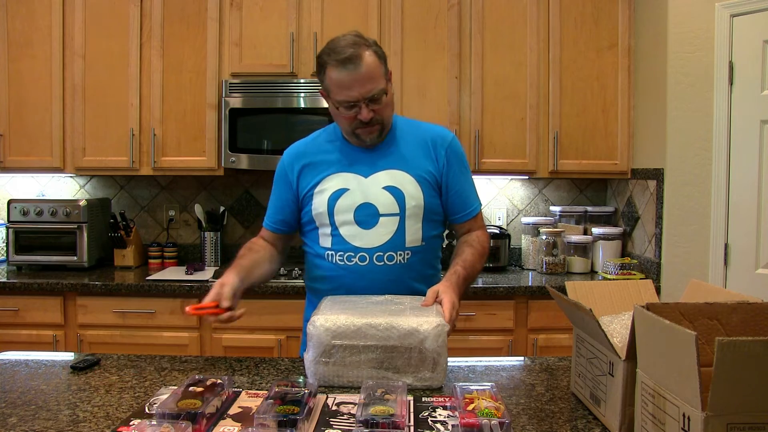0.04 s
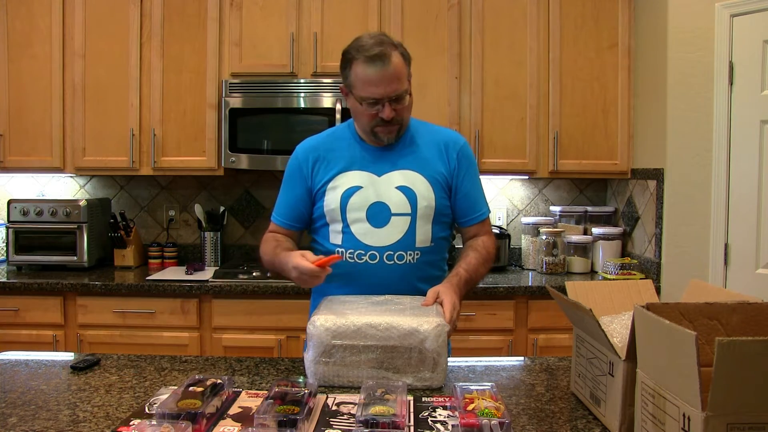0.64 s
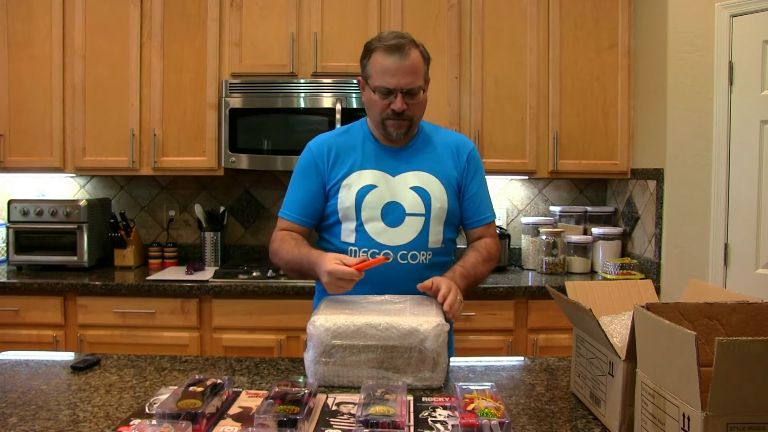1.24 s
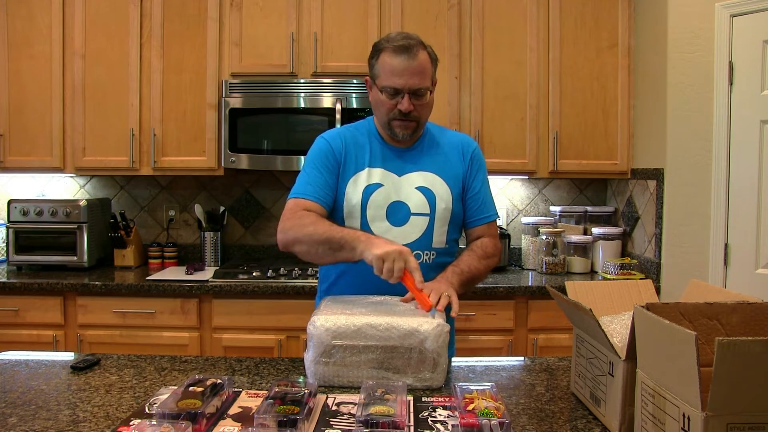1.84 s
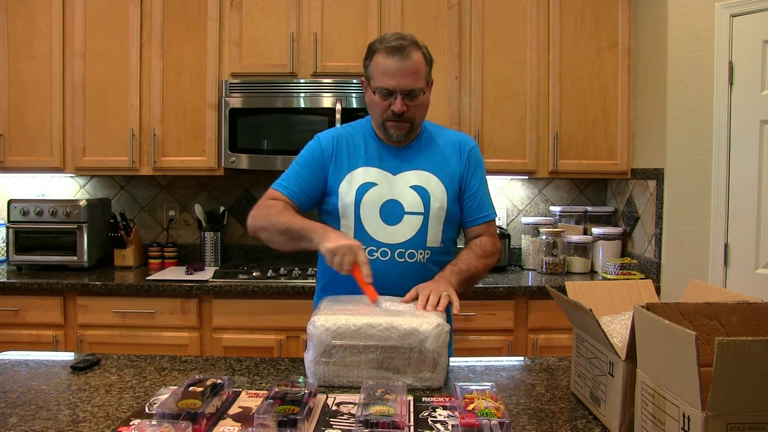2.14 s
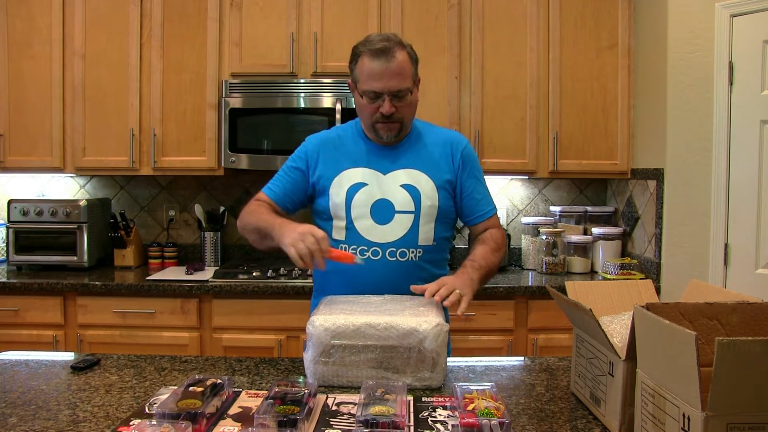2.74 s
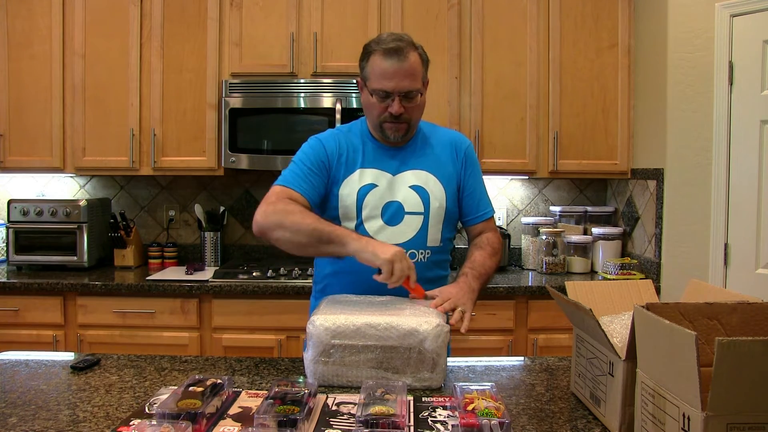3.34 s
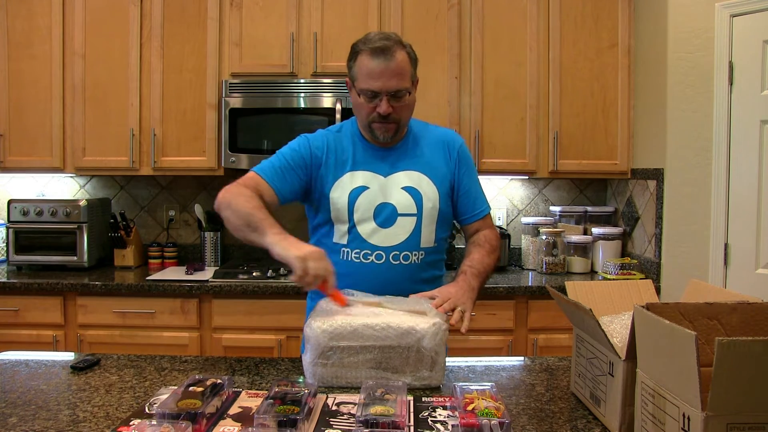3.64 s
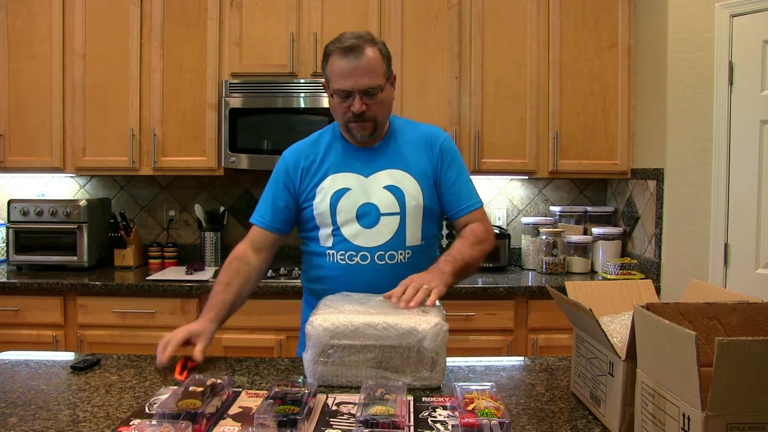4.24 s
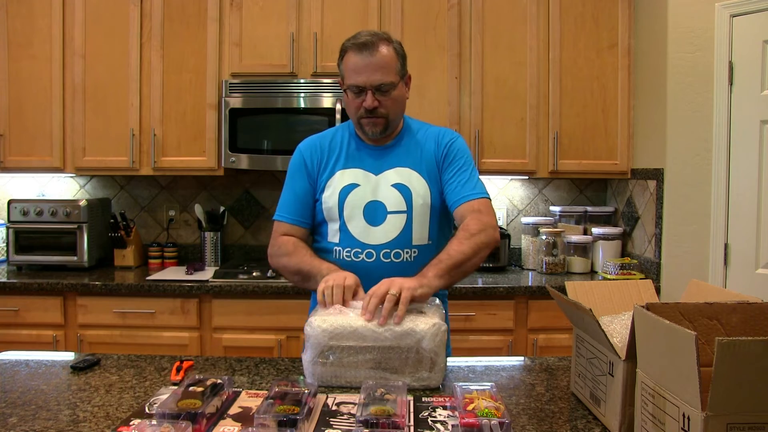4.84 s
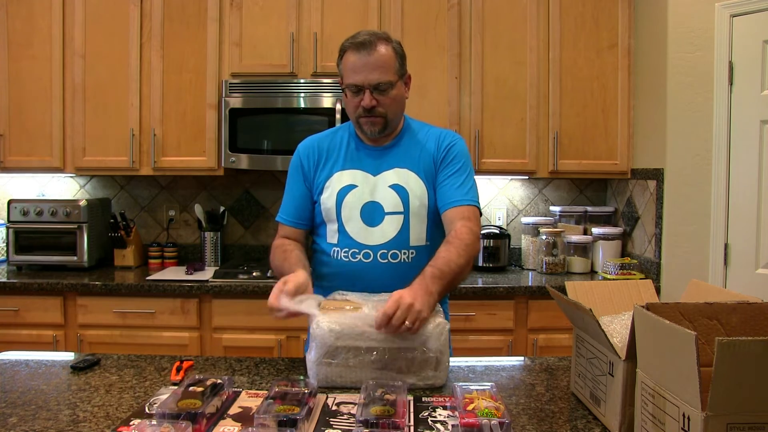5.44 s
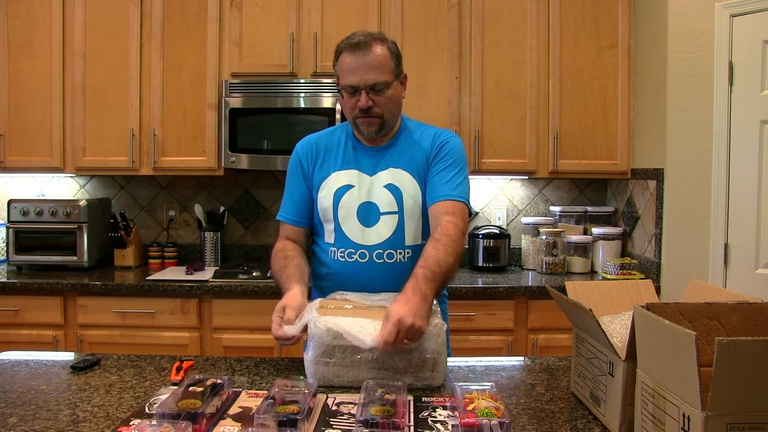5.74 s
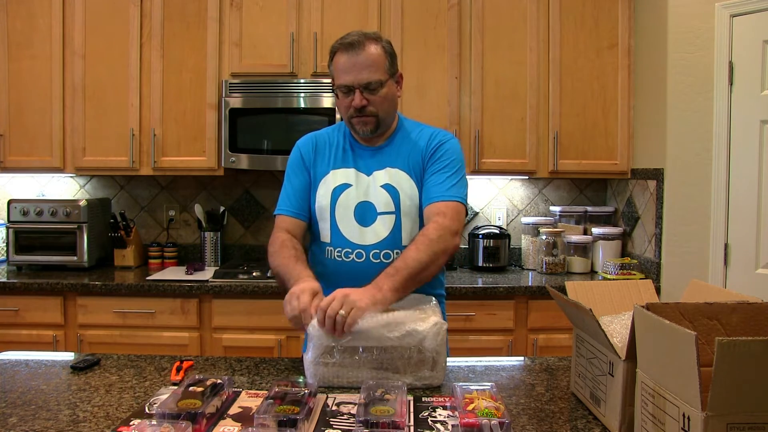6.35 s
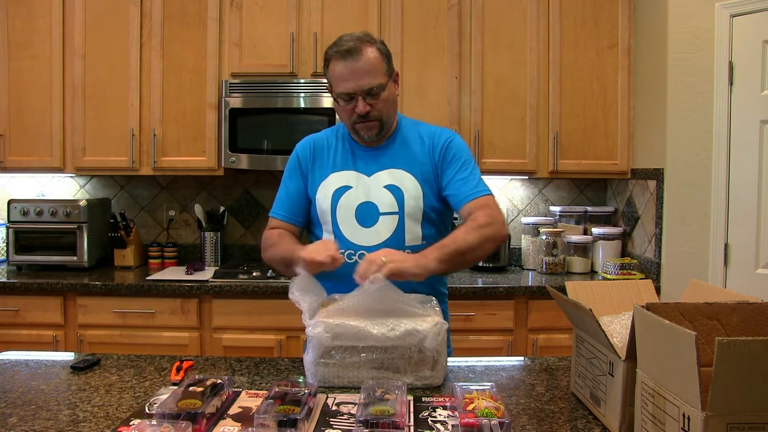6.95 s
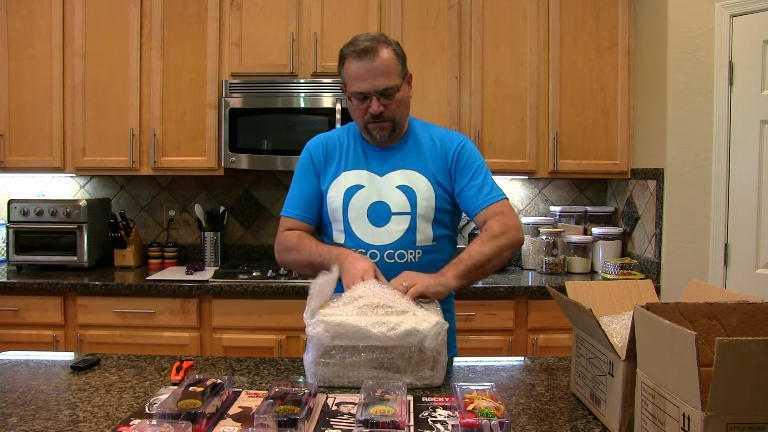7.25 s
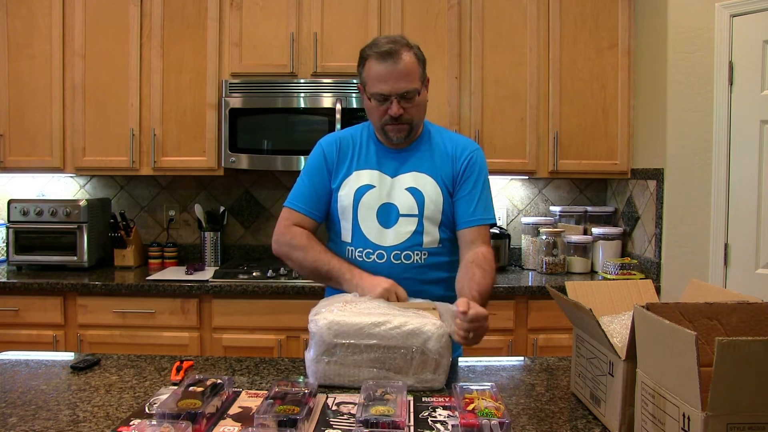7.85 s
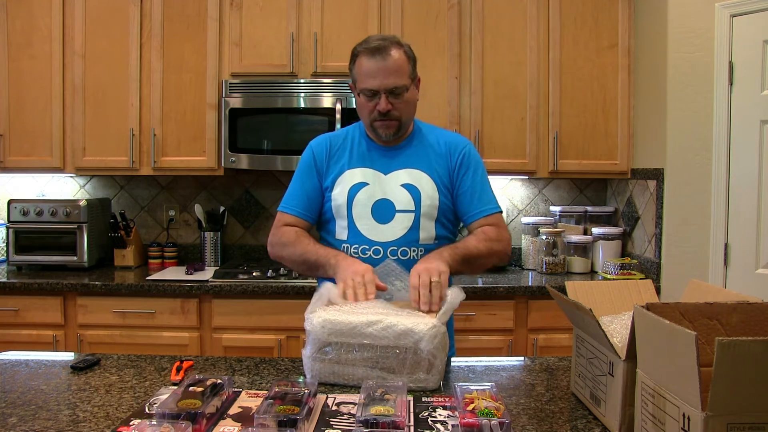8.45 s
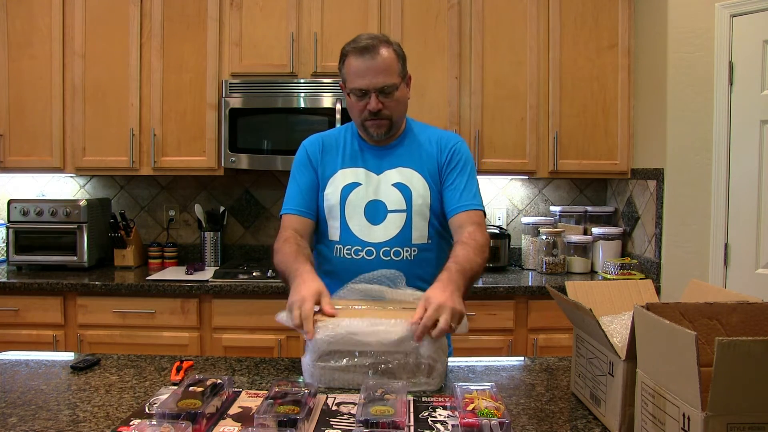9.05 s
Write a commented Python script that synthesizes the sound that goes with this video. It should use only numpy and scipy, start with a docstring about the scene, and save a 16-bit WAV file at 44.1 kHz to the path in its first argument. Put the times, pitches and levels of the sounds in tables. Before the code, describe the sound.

In a slightly echoing kitchen with a faint appliance hum, a run of sharp plastic clicks extends a knife blade. Two cuts tear through film and air cells on a wrapped box, then the knife lands on the stone counter and rattles briefly. From there on, the wrap crinkles, snaps and rips in uneven pulls while hands thud softly against the box, all fairly near the microphone.

```python
"""A box in bubble wrap and film is opened on a stone kitchen counter, over steady air noise and hum.
A utility knife's slider scrapes, then clicks out notch by notch (0.5 s). The wrap stirs (1.5 s) and the
blade slits it in two strokes (1.9 s, 3.4 s), tearing film, bursting cells and drumming the box.
The knife clatters onto the counter (4.2 s). Hands then pull the plastic apart to the end:
it rustles and rips, creases snap, the box is bumped."""
import sys
import numpy as np
from scipy import signal
from scipy.fft import rfft, irfft
from scipy.io import wavfile
from scipy.ndimage import uniform_filter1d

SR = 44100
rng = np.random.default_rng(int(sys.argv[2]) if len(sys.argv) > 2 else 0)


def generate_wav(sig):
    """Save sig (samples, or channels by samples) to the path in sys.argv[1] as 16-bit PCM at SR."""
    pcm = np.round(np.clip(np.atleast_2d(sig).T, -1, 1) * 32767).astype(np.int16)
    wavfile.write(sys.argv[1], SR, pcm)


N = 405940


def amp(db):
    """Decibels to gain."""
    return 10 ** (np.asarray(db) / 20)


def unit_rms(x):
    """Scale to rms 1."""
    return x / np.sqrt(np.mean(x ** 2) + 1e-20)


def unit_energy(x):
    """Scale to energy 1."""
    return x / np.sqrt(np.sum(x ** 2) + 1e-20)


def curve(points, hz):
    """Interpolate over log frequency."""
    f, value = np.transpose(points)
    return np.interp(np.log(hz + 1), np.log(f + 1), value)


def peaks(modes, hz):
    """Resonance peaks from rows of f/Hz, width/Hz, level/dB; height 1 at 0 dB."""
    return np.max([amp(db / 2) / (1 + (2 * (hz - f) / width) ** 2) for f, width, db in modes], 0)


def shelf(x, corner):
    """Smooth step from 0 to 1 around the corner."""
    return x ** 4 / (x ** 4 + corner ** 4)


def add(mix, at_s, sound):
    """Mix a sound in at a time."""
    part = mix[max(round(at_s * SR), 0):][:len(sound)]
    part += sound[:len(part)]


def impulse_response(shape_db, size=8192):
    """Minimum-phase response with spectrum shape_db(hz), energy 1."""
    level_db = shape_db(np.fft.rfftfreq(size, 1 / SR))
    cepstrum = irfft(np.log(amp(np.maximum(level_db, level_db.max() - 90))))
    cepstrum[1:size // 2] *= 2
    cepstrum[size // 2 + 1:] = 0
    return unit_energy(irfft(np.exp(rfft(cepstrum)))[:size // 2])


def shaped(x, shape_db):
    """Filter by shape_db(hz), then scale to rms 1."""
    return unit_rms(signal.oaconvolve(x, impulse_response(shape_db))[:len(x)])


def wander(cutoff_hz):
    """Low-passed noise, rms 1."""
    lowpass = 1 - shelf(np.fft.rfftfreq(N, 1 / SR), cutoff_hz)
    return unit_rms(irfft(rfft(rng.standard_normal(N)) * lowpass, N))


def slips(per_s, spread_db, cap=4):
    """Random train of tiny releases, mostly small, a few large."""
    size = amp(spread_db * np.minimum(rng.exponential(1, N), cap))
    return size * rng.choice([-1, 1], N) * (rng.random(N) < per_s / SR)


def crackle(train, decay_cycles, facets=16):
    """Each release flicks one facet of plastic, which rings briefly at its own note."""
    facet, out = rng.integers(0, facets, N), np.zeros(N)
    t = np.arange(SR // 150) / SR
    for k, hz in enumerate(np.geomspace(900, 14000, facets)):
        note = unit_energy(np.exp(-t * hz / decay_cycles) * np.cos(2 * np.pi * hz * t)) * np.sqrt(hz)
        out += signal.oaconvolve(train * (facet == k), note)[:N]
    return out


def flat_burst(envelope):
    """Noise burst, alternately whitened and pressed back under its envelope."""
    burst = rng.standard_normal(len(envelope)) * envelope
    for _ in range(4):
        burst = irfft(np.exp(1j * np.angle(rfft(burst))), len(envelope))
        burst *= envelope / np.sqrt(abs(uniform_filter1d(burst ** 2, 32)) + 1e-14)
    return unit_energy(burst)


def contact(scuff_s, scuff_gain):
    """Sharp touch plus a short scuff."""
    t = np.arange(1024) / SR
    touch = unit_energy(np.exp(-t / 0.0001))
    scuff = scuff_gain * unit_energy(np.exp(-t / scuff_s))
    return flat_burst(np.hypot(touch, scuff))


def strike(shape_db, force):
    """A force pulse rings a body; energy 1."""
    return unit_energy(signal.fftconvolve(impulse_response(shape_db), force))


# room air: f/Hz, level/dB
AIR_SPECTRUM = [(15, -28), (25, -24), (80, -15.5), (145, 0), (293, 2), (354, -7), (560, -5.5),
                (1230, -13.5), (1440, -11), (2410, -14), (3720, -10), (6210, -20.5), (8830, -22),
                (14800, -40), (16000, -31)]
# hum partials: f/Hz, level/dB
HUM_PARTIALS = [(178, -83), (237, -62), (296, -63), (421, -75)]

def background(air_db=-52.5, hum_db=-3, drift_rad=0.91):
    """Steady air noise and the wavering hum of an appliance."""
    air, diffuse = (amp(air_db) * shaped(rng.standard_normal(N), lambda hz: curve(AIR_SPECTRUM, hz))
                    for _ in range(2))
    hum, t = np.zeros(N), np.arange(N) / SR
    for hz, db in HUM_PARTIALS:
        phase = 2 * np.pi * hz * t + drift_rad * wander(cutoff_hz=2.8)
        hum += amp(db + hum_db) * np.sqrt(2) * np.sin(phase)
    return stereo(air + hum, diffuse)


# slider moves: t/s, length/s, level/dB
SLIDES = [(0, 0.013, -43.5), (0.293, 0.016, -49)]

def slider(squeak_hz=3300, width_hz=1500, squeak_db=13):
    """Plastic scrapes faintly on plastic before the first notch gives."""
    shape = lambda hz: (squeak_db * peaks([(squeak_hz, width_hz, 0)], hz)
                        + 10 * shelf(hz, 1600) - 9 * shelf(hz, 7600))
    scrape, gate = shaped(slips(per_s=2800, spread_db=0.5), shape), np.zeros(N)
    for at_s, length_s, db in SLIDES:
        add(gate, at_s, amp(db) * signal.windows.tukey(int(length_s * SR), 0.5))
    return gate * scrape


# notch clicks: t/s, level/dB, treble/dB
NOTCHES = [(0.4798, -14.3, 3.5), (0.5465, -16.5, -0.5), (0.615, -21, -1), (0.7115, -21.5, 1.5),
           (0.7935, -19, 1.5), (0.9362, -23, 2.5), (1.0457, -26, -1), (1.15, -26.5, -3), (1.27, -25, -4)]
# handle: f/Hz, level/dB
HANDLE_SPECTRUM = [(500, -39), (1000, -20.5), (1450, -8.5), (2000, -4), (2700, -7), (3400, -9.5),
                   (4400, -2), (6000, -5), (9000, -2.5), (11500, -10), (16000, -20)]
# resonances as the blade extends: t/s, hollow f/Hz, blade f/Hz
EXTENSION = [(.48, 1750, 3840), (.56, 1810, 4000), (.79, 1970, 3300), (1.27, 2260, 3270)]
# slider spring: f/Hz, width/Hz, level/dB
SPRING_MODES = [(3270, 490, 5), (4800, 250, -27), (5950, 280, -15), (7480, 400, -12), (8780, 470, -22)]

def ratchet(gain_db=21, modes_db=10, hollow_width_hz=420, blade_width_hz=1100, lead_s=0.00118):
    """Each notch clicks in the hollow plastic handle, with a faint lead-in just before."""
    out = np.zeros(N)
    times_s, hollow_hz, blade_hz = np.transpose(EXTENSION)
    for at_s, db, treble_db in NOTCHES:
        modes = [(np.interp(at_s, times_s, hollow_hz), hollow_width_hz, -6),
                 (np.interp(at_s, times_s, blade_hz), blade_width_hz, -3)]
        modes += [(hz, width, level + 4 * rng.standard_normal()) for hz, width, level in SPRING_MODES]
        shape = lambda hz: (curve(HANDLE_SPECTRUM, hz) + modes_db * peaks(modes, hz)
                            + treble_db * shelf(hz, 4700))
        lead_in = strike(shape, contact(scuff_s=0.0045, scuff_gain=9.1))
        click = strike(shape, contact(scuff_s=0.0026, scuff_gain=5.6))
        add(out, at_s - lead_s, amp(db + gain_db - 19) * lead_in)
        add(out, at_s, amp(db + gain_db) * click)
    return out


# pulls on the wrap: peak t/s, build/s, ease/s, level/dB, cell rub/dB
PULLS = [(1.56, 0.061, 0.17, -46.5, -10), (3.05, 0.28, 0.45, -48, -5), (4.06, 0.091, 0.11, -47, 6),
         (4.68, 0.12, 0.24, -37.5, -3), (4.9, 0.035, 0.53, -34.5, -7), (5.36, 0.07, 0.38, -26, -6.5),
         (5.2, .15, 0.095, -33, -7.5), (5.63, 0.057, 0.075, -21.5, -6), (5.93, .15, 0.078, -31, -6.5),
         (6.36, 0.23, .2, -40, 3.5), (6.62, 0.18, 0.11, -25, -12.5), (6.85, 0.36, 0.1, -29.5, -10),
         (7.3, 0.14, 0.37, -40, 1), (7.698, 0.087, 0.11, -26.5, -2.5), (7.78, 0.037, 0.084, -26.5, -6),
         (8.03, 0.17, 0.11, -28, -5.5), (8.14, 0.11, 0.16, -27.5, -5.5), (8.86, 0.32, 0.45, -34, -5),
         (9.12, 0.2, 0.27, -32, -4.5)]
# film: f/Hz, level/dB
FILM_SPECTRUM = [(410, -18), (700, -8), (767, -11.5), (1050, -8), (1730, -5.5), (2160, -1.5), (2660, 0.5),
                 (4730, 1.5), (7890, -2), (11700, -9), (15200, -18), (16000, -39)]
# rubbing air cells: f/Hz, level/dB
CELL_SPECTRUM = [(70, -38), (120, -5.5), (200, -3), (400, -2), (700, -3), (1200, -4.5), (1800, -1),
                 (2800, -25)]

def rustle(film_db=-5.5, cells_db=-7.5, swell_db=10, settle_s=0.16, settle_db=-22, settle_rub_db=-5):
    """Bending film sheds clumps of crackles and a few larger crinkles; its air cells rub together."""
    creases = slips(per_s=6000, spread_db=2.5, cap=3.6) * amp(1.13 * wander(cutoff_hz=58))
    crinkles = crackle(slips(per_s=99, spread_db=2, cap=2.95), decay_cycles=1.6)
    crinkles = shaped(crinkles, lambda hz: -7 * shelf(hz, 4200))
    crackles = unit_rms(crackle(creases, decay_cycles=0.8))
    film = shaped(crackles + 0.58 * crinkles, lambda hz: curve(FILM_SPECTRUM, hz))
    cells = shaped(slips(per_s=1200, spread_db=5.5, cap=3.1), lambda hz: curve(CELL_SPECTRUM, hz))
    # slit film springs apart after each knife push
    settling = [(end_s + settle_s / 2, settle_s / 2, settle_s, db + settle_db, settle_rub_db)
                for _, _, end_s, db, _ in KNIFE_PUSHES]
    bending, rubbing = np.zeros((2, N))
    t = np.arange(N) / SR
    for peak_s, build_s, ease_s, db, rub_db in PULLS + settling:
        off_peak = np.maximum((peak_s - t) / build_s, (t - peak_s) / ease_s)
        power = amp(db - swell_db * np.minimum(off_peak, 20)) ** 2
        bending += power
        rubbing += amp(rub_db) ** 2 * power
    return amp(film_db) * film * np.sqrt(bending) + amp(cells_db) * cells * np.sqrt(rubbing)


# crease snaps: t/s, level/dB, treble/dB, pop/dB
SNAPS = [(1.8755, -36.5, -12, -9), (1.8938, -23.5, -15.5, -20.5), (3.0421, -41, -13, -16),
         (3.279, -42, -8, -6), (3.286, -31.5, -14, -11), (3.742, -18, -4, -4), (4.6847, -30, -17, 2),
         (4.89, -31, -14, -12), (5.2325, -29, 0, -20), (5.2962, -26, -1, -15), (5.422, -19.5, -6.5, 2),
         (5.5198, -24, 1, 1), (5.635, -16, -14, -26), (5.744, -20.5, -1, -22), (5.775, -21, -11, -14),
         (5.948, -30, -4, -15), (6.615, -26.5, 19, 0), (6.7706, -26, -7, -10), (7.749, -25.5, 2, 2.5),
         (7.7632, -22, -12, -6), (7.908, -22.5, -9.5, 2), (8, -26, -11, -3.5), (8.0249, -23, 3, -10),
         (8.5369, -29, -44, 3), (8.963, -28.5, -11, -17)]

def snaps(gain_db=23.5, base_hz=2110, octaves_per_db=0.52, note_db=7):
    """Taut creases flip, some thumping the air cell beneath; the more pop, the higher the brief note."""
    # crease: f/Hz, level/dB
    crease = [(60, -28), (140, -2), (300, 1.5), (700, -2), (2000, 4), (4500, 8.5), (8000, 5.5),
              (15000, -16.5)]
    out = np.zeros(N)
    for at_s, db, treble_db, pop_db in SNAPS:
        note_hz = base_hz * 2 ** (octaves_per_db * pop_db)
        shape = lambda hz: (curve(crease, hz) + note_db * peaks([(note_hz, note_hz / 2, 0)], hz)
                            + (treble_db + 2) * shelf(hz, 3700) + (pop_db + 6) * (1 - shelf(hz, 1200)))
        add(out, at_s, amp(db + gain_db) * strike(shape, contact(scuff_s=0.00172, scuff_gain=1.77)))
    return out


# hand bumps: t/s, level/dB, thud f/Hz
BUMPS = [(1.89, -29, 595), (4.68, -26.5, 285), (4.75, -34.5, 141), (4.928, -30.5, 457), (5.328, -24.5, 497),
         (5.374, -30, 400), (5.419, -16.5, 400), (5.454, -28.5, 480), (5.514, -30, 253),
         (5.612, -25.5, 495), (5.923, -30.5, 447), (6.122, -28, 467), (6.452, -32.5, 350),
         (7.194, -24, 225), (7.366, -27, 211), (7.394, -25, 200), (7.581, -24.5, 263), (7.9, -22, 425),
         (8.339, -29, 200), (8.398, -30, 190), (8.532, -31, 620), (8.848, -30, 260), (8.969, -31, 240)]
# box under a hand: f/Hz, width/Hz, level/dB
PALM_MODES = [(122, 76, 0), (186, 26, -16), (296, 21, -15), (472, 120, -20)]

def bumps(gain_db=20, db_per_octave=9, modes_db=8, rise_s=0.00505):
    """Soft blows on the padded box: palms boom low, fingers knock higher."""
    padding = [(30, -41), (72, -25), (112, 2), (1000, 2), (2500, 2), (6000, -34)]  # f/Hz, level/dB
    out, t = np.zeros(N), np.arange(4096) / SR
    for at_s, db, thud_hz in BUMPS:
        shape = lambda hz: (curve(padding, hz) + modes_db * peaks(PALM_MODES, hz)
                            - db_per_octave * np.hypot(np.log2((hz + 1) / thud_hz), 0.7))
        force = flat_burst(t * np.exp(-t / rise_s))
        add(out, at_s, amp(db + gain_db) * strike(shape, force))
    return out


# pushes through the wrap: start t/s, attack/s, end t/s, level/dB, box/dB
KNIFE_PUSHES = [(1.945, 0.16, 2.49, -19, 1.5), (3.435, 0.077, 3.674, -20, 2.5),
                (3.724, 0.016, 3.803, -15.5, -1.5)]
# blade in film: f/Hz, level/dB
RASP_SPECTRUM = [(50, -44), (250, -20.5), (600, 9), (1100, 0.5), (2000, 0.5), (2800, 0.5), (4500, 0),
                 (6000, -5), (8200, -7.5), (11500, -17.5), (16000, -28)]
# box body: f/Hz, level/dB
BOX_SPECTRUM = [(25, -50), (45, -41), (75, -29), (110, -6.5), (175, -2.5), (240, -4), (330, -7.5),
                (550, -2.5), (750, -4), (1000, -11.5), (1600, -50.5)]
# box resonances: f/Hz, width/Hz, level/dB
BOX_MODES = [(182, 44, 0), (305, 74, 0), (428, 25, -12.5), (480, 43, -6), (730, 22, -28)]

def cutting(rasp_db=-3, drum_db=-2.5, bite_db=22.5, sag_db_per_s=9.5, release_db_per_s=303):
    """The blade catches and bursts cell after cell: each catch tears film and drums the box."""
    out, t = np.zeros(N), np.arange(N) / SR
    catches = slips(per_s=210, spread_db=4.5, cap=2.6)
    tear_power = signal.oaconvolve(catches ** 2, np.exp(-t[:1024] / 0.00099))[:N]
    tearing = unit_rms(np.sqrt(abs(tear_power)) * rng.standard_normal(N))
    pops = shaped(catches, lambda hz: -14 * shelf(hz, 3300))
    scrape = unit_rms(crackle(slips(per_s=5000, spread_db=2.8, cap=1.1), decay_cycles=0.68))
    rasp = shaped(tearing + 0.5 * pops + 0.72 * scrape, lambda hz: curve(RASP_SPECTRUM, hz))
    drum = shaped(catches, lambda hz: curve(BOX_SPECTRUM, hz) + 6 * peaks(BOX_MODES, hz))
    for start_s, attack_s, end_s, db, box_db in KNIFE_PUSHES:
        force_db = bite_db * np.minimum((t - start_s) / attack_s - 1, 0)
        force_db -= sag_db_per_s * np.maximum(t - start_s - attack_s, 0)
        force_db -= release_db_per_s * np.maximum(t - end_s, 0)
        # box drums most at mid-push
        damping_db = 4.5 * np.interp(t, [start_s, end_s], [-1, 1]) ** 2
        cut = amp(rasp_db) * rasp + amp(drum_db + box_db - damping_db) * drum
        out += amp(db + np.maximum(force_db, -200)) * cut
    return out


# blade drags: t/s, length/s, level/dB
DRAGS = [(3.452, 0.052, -25)]
# squeak resonances: f/Hz, width/Hz, level/dB
DRAG_MODES = [(780, 130, 0), (2740, 510, -4)]

def drag(modes_db=13):
    """Before it bites, the blade sticks and slips on taut film with a rough squeak."""
    shape = lambda hz: curve(RASP_SPECTRUM, hz) + modes_db * peaks(DRAG_MODES, hz)
    squeak, gate = shaped(slips(per_s=900, spread_db=2.5), shape), np.zeros(N)
    for at_s, length_s, db in DRAGS:
        add(gate, at_s, amp(db) * signal.windows.tukey(int(length_s * SR), 0.15))
    return gate * squeak


# film rips: t/s, length/s, level/dB, treble/dB
RIPS = [(3.488, 0.058, -27, -5), (3.744, 0.05, -23.5, 3), (5.294, 0.058, -29, -2), (5.598, 0.041, -21.5, 6),
        (5.645, 0.018, -33, -9), (5.768, .012, -28, -0.5)]

def rips(gain_db=-1):
    """Stretched film lets go in a fast run of tiny breaks."""
    breaks, out = slips(per_s=3200, spread_db=4.5), np.zeros(N)
    for at_s, length_s, db, treble_db in RIPS:
        run = breaks[int(at_s * SR):][:int(length_s * SR)]
        rip = shaped(run, lambda hz: curve(FILM_SPECTRUM, hz) + treble_db * shelf(hz, 3100))
        add(out, at_s, amp(db + gain_db) * rip * signal.windows.tukey(len(run), 0.3))
    return out


# knife hits on stone: t/s, level/dB, treble/dB
LANDINGS = [(4.1891, -10, 5.5), (4.2177, -18, -9), (4.2241, -8.5, -3), (4.238, -24, -2), (4.3549, -16, -10),
            (4.359, -7.5, 2.5), (4.368, -20, 2), (4.376, -18, -1), (4.4382, -14, 1), (4.4499, -14, -5),
            (4.4887, -14, -3)]
# knife body: f/Hz, level/dB
KNIFE_SPECTRUM = [(40, -49), (150, -13), (400, -13.5), (750, -8), (1400, -13.5), (2400, -5.5), (4400, -1.5),
                  (7000, -1.5), (9000, -6), (12000, -13.5), (16000, -27)]
# knife on its end: f/Hz, width/Hz, level/dB
ON_END_MODES = [(1750, 140, -8), (2300, 150, -4), (4510, 600, -5.5), (6950, 500, -14)]
# knife lying flat: f/Hz, width/Hz, level/dB
FLAT_MODES = [(3314, 240, 2.5), (4260, 370, -11), (6160, 360, -22), (8400, 300, -15)]

def clatter(gain_db=21, modes_db=12, flat_at_s=4.3):
    """The knife lands on its end, tips over and rocks; the loose blade buzzes at each blow."""
    out = np.zeros(N)
    for at_s, db, treble_db in LANDINGS:
        modes = FLAT_MODES if at_s > flat_at_s else ON_END_MODES
        shape = lambda hz: (curve(KNIFE_SPECTRUM, hz) + modes_db * peaks(modes, hz)
                            + (treble_db - 1) * shelf(hz, 5294))
        add(out, at_s, amp(db + gain_db) * strike(shape, contact(scuff_s=0.0038, scuff_gain=5.6)))
    return out


# diffuse sound in the side channel: f/Hz, level/dB
SIDE_SPECTRUM = [(100, -17), (280, -16), (600, -11.5), (1300, -6), (2800, -8.5), (5500, -11.5), (9000, -12),
                 (13000, -99)]

def stereo(mid, diffuse):
    """Two close microphones differ only by a share of the diffuse sound."""
    side_gain = amp(curve(SIDE_SPECTRUM, np.fft.rfftfreq(N, 1 / SR)))
    side = irfft(rfft(diffuse) * side_gain, N)
    return np.array([mid + side, mid - side])


# kitchen decay: f/Hz, T60/s
KITCHEN_T60 = [(120, 0.43), (500, 0.62), (2000, 0.7), (4500, 0.61), (9000, 0.48), (15000, 0.33)]

def tail(build_s=0.0013):
    """Dense reflections build up and die, each band at its own rate."""
    hz, t, bands = signal.stft(rng.standard_normal(SR * 3 // 4), SR, nperseg=256)
    bands *= amp(-60 * t / curve(KITCHEN_T60, hz)[:, None])
    decay = signal.istft(bands, SR, nperseg=256)[1]
    return unit_energy(decay * shelf(np.arange(len(decay)) / SR, build_s))


# counter and cupboard echoes: delay/s, gain
ECHOES = [(.0066, 0.12), (.0082, 0.42), (0.0149, 0.43), (0.0162, .17), (.0235, 0.33)]

def kitchen(direct, wet_db, spots_per_s, spots=5):
    """Direct sound plus echoes and a tail, crossfaded as the sound moves from spot to spot."""
    place = np.arange(N) / SR * spots_per_s % spots
    mid = direct.copy()
    for k in range(spots):
        room = amp(wet_db) * tail()
        for delay_s, gain in ECHOES:
            add(room, delay_s * rng.uniform(0.96, 1.04), gain * contact(scuff_s=0.00078, scuff_gain=2))
        distance = abs((place - k + spots / 2) % spots - spots / 2)
        fade = np.cos(np.pi / 2 * np.minimum(distance, 1))
        mid += signal.oaconvolve(direct * fade, room)[:N]
    return stereo(mid, signal.oaconvolve(direct, tail())[:N])


def scene():
    """All sources in the kitchen; rustle comes from all over the sheet, bumps from the box alone."""
    mix = background()
    mix += kitchen(slider() + ratchet(), wet_db=-1, spots_per_s=30)
    mix += kitchen(rustle() + rips(), wet_db=-2.5, spots_per_s=210)
    mix += kitchen(snaps(), wet_db=-3, spots_per_s=12)
    mix += kitchen(bumps(), wet_db=-3, spots_per_s=12)
    mix += kitchen(cutting() + drag(), wet_db=-1.5, spots_per_s=45)
    mix += kitchen(clatter(), wet_db=-0.5, spots_per_s=60)
    return mix


def record(dry):
    """Soft clip near full scale, then low-pass."""
    ceiling, cutoff_hz = 1.1, 16200
    lowpass = signal.firwin(401, cutoff_hz, window=("kaiser", 9), fs=SR)
    return signal.oaconvolve(ceiling * np.tanh(dry / ceiling), lowpass[None], "same")


dry = scene()
out = record(dry)
generate_wav(out)
```